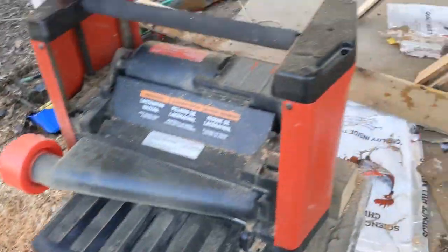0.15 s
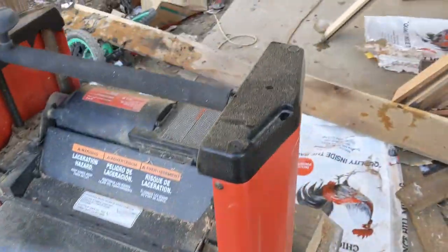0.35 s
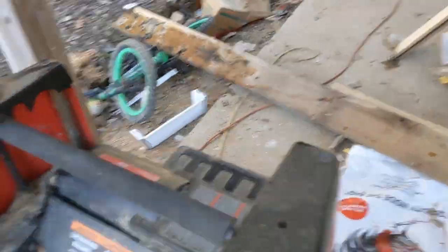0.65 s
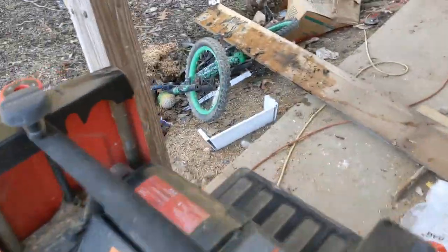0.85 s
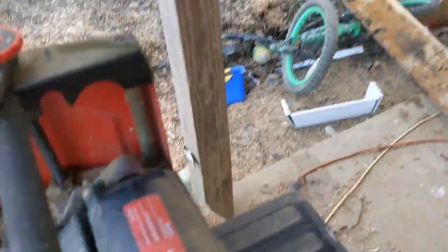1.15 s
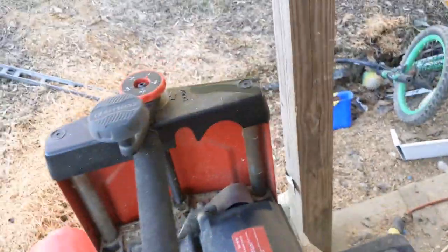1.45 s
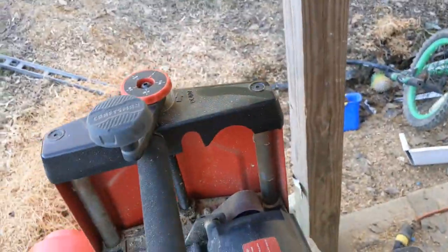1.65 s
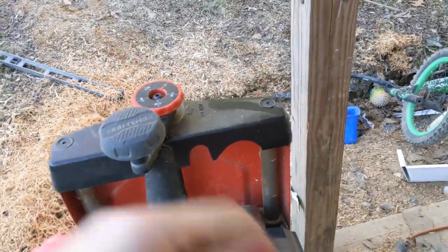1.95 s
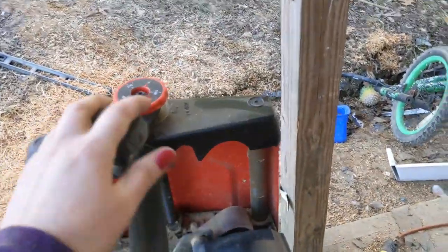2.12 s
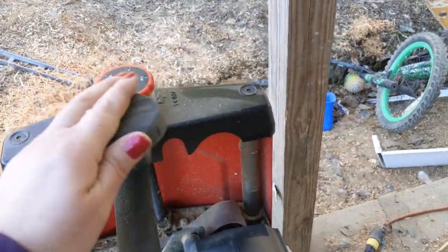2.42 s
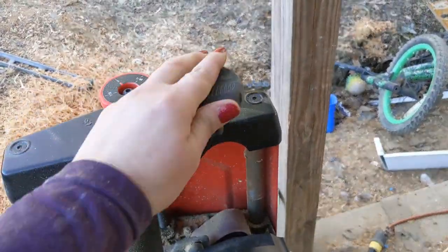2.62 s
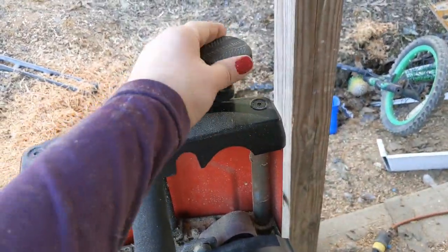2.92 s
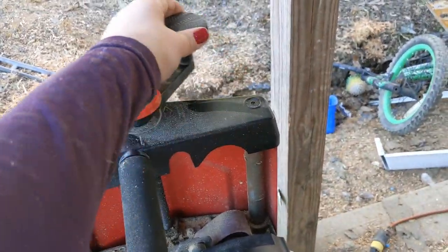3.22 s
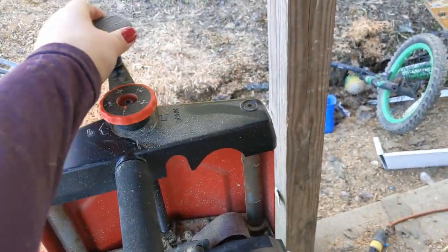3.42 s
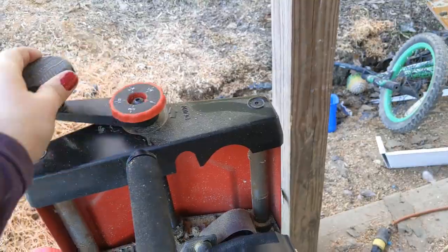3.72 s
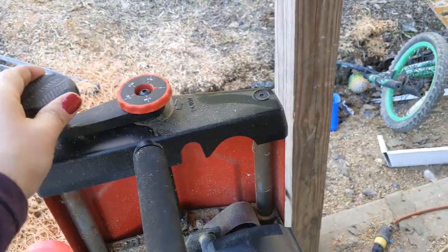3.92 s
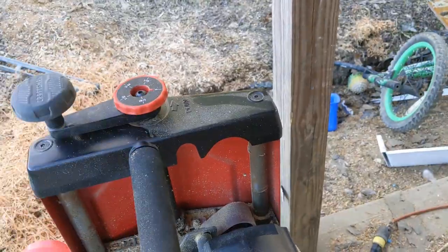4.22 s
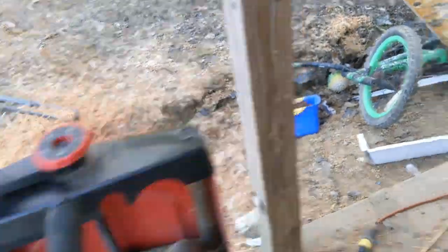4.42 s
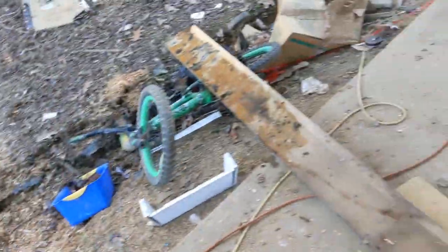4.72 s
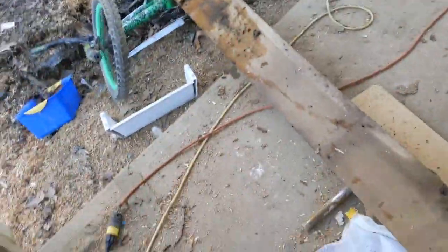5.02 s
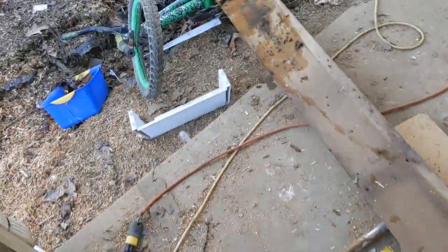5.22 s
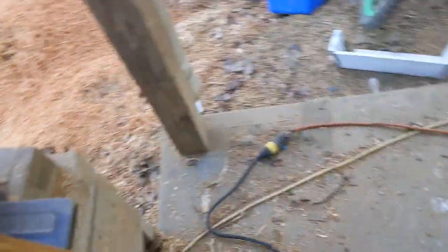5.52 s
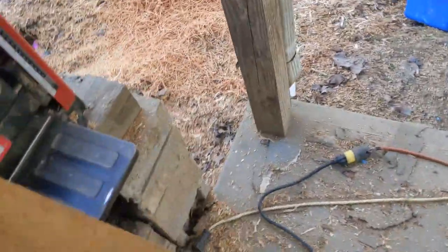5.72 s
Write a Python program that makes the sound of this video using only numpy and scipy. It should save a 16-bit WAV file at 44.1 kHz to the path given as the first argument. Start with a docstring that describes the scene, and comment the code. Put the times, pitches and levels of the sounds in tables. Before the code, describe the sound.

Outdoors, a small electric planer runs continuously, heard close on a handheld stereo phone. A deep hum and high motor whine sit inside rushing air. An exhaust whoosh swells and cuts off early; the middle stays steady beside the crank, then the sound shifts and the hum thins as the listener moves to the far side.

```python
"""A benchtop planer runs outdoors. At first the listener is on its infeed side, where the exhaust stream whooshes by.
From about 1 s the listener is at the height crank; a hand on the crank damps the frame's buzz around 3 s.
After about 4.2 s the listener moves on to the outfeed, and each side has its own balance of tones and air.
All along, the cutterhead hums on multiples of its speed and the motor whines a little over twice as fast;
air, made from shaped noise, rushes through the housing and throbs with each lap of the belt."""
import sys
import numpy as np
from scipy import signal
from scipy.fft import rfft, irfft
from scipy.io import wavfile
from scipy.ndimage import uniform_filter1d

SR = 44100
rng = np.random.default_rng(int(sys.argv[2]) if len(sys.argv) > 2 else 0)


def store_pcm(level_fs):
    """Save levels as 16-bit WAV."""
    pcm = np.round(np.clip(level_fs, -1, 1) * 32767).astype(np.int16)
    wavfile.write(sys.argv[1], SR, np.atleast_2d(pcm).T)


N = 258426
TIME = np.arange(N) / SR  # s
FREQ = np.fft.rfftfreq(N, 1 / SR) + 1e-3  # Hz, kept above zero for divisions and logarithms


def undb(db):
    """Turn decibels into gain."""
    return 10 ** (np.asarray(db) / 20)


def panned(difference):
    """Split a left-minus-right difference evenly into a left and a right offset, in the same unit."""
    return np.array([[.5], [-.5]]) * difference


def curves(table):
    """Join each column of a table by straight lines in time."""
    s, *columns = np.transpose(table)
    return [np.interp(TIME, s, column) for column in columns]


def swell(s, length):
    """A bell-shaped rise and fall around time s, 1 at its middle."""
    return np.exp(-(2 * (TIME - s) / length) ** 2)


def walk(rate):
    """Smooth random wavering of spread 1 that changes about rate times a second."""
    size = 8192
    hz = np.fft.rfftfreq(size, TIME[-1] / size)
    slow = irfft(rfft(rng.standard_normal(size)) / np.sqrt(1 + (hz / rate) ** 6))
    return np.interp(TIME, np.linspace(0, TIME[-1], size), slow / slow.std())


# the listener's way round the machine: (time [s], place [-1 infeed, 0 crank, 1 outfeed])
PATH = [(0, -1.06), (0.8, -0.86), (0.97, -0.53), (1.15, 0.009), (4.2, -0.01), (4.58, 0.3), (4.74, 0.82),
        (5.05, 1), (5.86, 0.97)]


def at_place(levels):
    """A value that glides between its infeed, crank and outfeed settings as the listener moves."""
    return np.interp(curves(PATH)[0], (-1, 0, 1), levels)


BELT_HZ = 43.05  # laps of the belt per second


def belt(depth):
    """A gain that throbs once a lap of the belt."""
    return 1 + depth * np.sin(2 * np.pi * BELT_HZ * TIME)


def resonance(hz, width_hz):
    """Gain of a resonance, 1 at its centre and falling away on both sides."""
    return 1 / (1 + (1.83 * (FREQ - hz) / width_hz) ** 2)


# likeness of the air's noise at the left and right microphone ports: (frequency [Hz], correlation [0-1])
LIKENESS = [(30, 0.27), (200, 0.94), (800, 0.69), (1400, 0.37), (2800, 0.46), (4400, 0), (7000, 0.16)]


def port_noise():
    """Spectra of unit noise per Hz at the two ports: most alike in the bass, hardly alike in the top treble."""
    hz, alike = np.transpose(LIKENESS)
    alike = np.clip(np.interp(FREQ, hz, alike), 0, 1)
    mid, side = rfft(rng.standard_normal((2, N))) * np.sqrt(SR) / 2
    shared = mid * np.sqrt(1 + alike)
    opposite = side * np.sqrt(1 - alike)
    return shared + np.array([[1], [-1]]) * opposite


def sliding_band(noise, shape, shift_hz):
    """Noise with a resonant shape whose centre slides by shift_hz over time."""
    # keeping only positive frequencies lets a turning phase move the whole band
    band = 2 * np.fft.ifft(noise * shape, N)
    return (band * np.exp(2j * np.pi * np.cumsum(shift_hz) / SR)).real


def tone(turns, multiple, db, flutter_db, apart=0):
    """One multiple of a shaft's rotation; apart sets how far its phase drifts between the ports (radians)."""
    k = round(multiple)
    # the housing delays each multiple more than the last, which smears the chops into an even hum
    smear = 3 * np.pi / 8 * k ** 2
    phase = 2 * np.pi * k * turns - smear + panned(apart * walk(1))
    return np.sqrt(2) * undb(db + flutter_db * walk(33)) * np.sin(phase)


# level of the draught, before its overall gain: (infeed [dB], crank [dB], outfeed [dB])
DRAUGHT_DB = (-67, -55.5, -72)
# puffs of draught on the microphone: (time [s], length [s], rise [dB])
PUFFS = [(0.896, 0.11, 7), (2.274, 0.11, 7), (5.448, 0.089, 20), (5.83, .25, 9)]


def draught(level_db=-22.0, top_hz=170, gust_db=2.0):
    """The machine's draught brushes the microphone as a low rumble, most of all by the crank, with a few puffs."""
    puff_db = sum(rise * swell(s, length) for s, length, rise in PUFFS)
    rumble = irfft(port_noise() / (1 + (FREQ / top_hz) ** 4), N)
    return rumble * undb(level_db + at_place(DRAUGHT_DB) + puff_db + gust_db * walk(13))


# basic colour of the rushing air: (frequency [Hz], left [dB per Hz], right [dB per Hz])
RUSH = [(30, -81, -81.5), (102, -71, -76.5), (190, -74, -74.5), (356, -63, -65), (643, -66, -99),
        (1045, -67, -65.5), (1440, -73.5, -75.5), (1800, -71, -68.5), (2950, -68.5, -65),
        (4120, -72.5, -73), (6020, -72.5, -73.5), (6820, -75, -77.5), (9340, -72.5, -73.5),
        (12140, -82.5, -76), (15500, -86.5, -84.5)]
# added colour on each side of the machine: (frequency [Hz], infeed [dB], crank [dB], outfeed [dB])
RUSH_SIDES = [(140, 3, 3, 0.5), (257, -1, 0.4, 1.5), (604, 1, 2, 0.5), (905, 0, 0.5, -1), (1450, 4, 4, 3.5),
              (1950, 1, 1.5, 1.5), (2850, 0.5, 1, -0.5), (4360, -0.1, 1, 2.2), (6500, -0.5, -0.3, 2),
              (11000, 0.5, 0, 1.7), (13500, 1, 0.5, -1)]
# the hiss as the ports turn, of which only the departure from each column's median counts, less at low pitch:
# (time [s], treble level [dB], left minus right of the top treble [dB])
HISS = [(0.0, -38, -3), (0.54, -35.5, 6), (0.64, -33, -4), (0.72, -35.5, -1), (1.24, -32.5, 2),
        (1.3, -35, 7), (1.37, -34.5, -1), (1.73, -34.5, 1), (2.59, -33.5, -3.5), (4.69, -34.5, -0.5),
        (4.82, -38.5, 6), (5.09, -38, -2), (5.5, -42.5, -9), (5.81, -36.5, 1), (5.86, -39, -4)]


def air(throb=0.16, throb_hz=1500, flicker_db=0.5, own_flicker_db=1.07, beam_hz=3500):
    """Turbulent air rushes out; its hiss pulses once a lap of the belt, and its treble depends on the ports' aim."""
    hz, *sides = np.transpose(RUSH)
    colour = np.array([undb(np.interp(np.log(FREQ), np.log(hz), db)) for db in sides])
    # the small housing radiates little bass
    spectrum = port_noise() * colour / np.sqrt(1 + (190 / FREQ) ** 8)
    treble_db, shade_db = (column - np.median(column) for column in curves(HISS))
    zones = np.transpose(RUSH_SIDES)[0]
    gusts, out = walk(41), 0
    # each zone of pitch fades into its neighbours and has its own level
    for (centre, *levels), own in zip(RUSH_SIDES, np.eye(len(zones))):
        band = irfft(spectrum * np.interp(np.log(FREQ), np.log(zones), own), N)
        pulse = belt(throb * centre / (centre + throb_hz))  # deeper in the treble
        aim_db = treble_db / (1 + (beam_hz / centre) ** 2)
        aim_db = aim_db + panned(shade_db * (centre / zones[-1]) ** 2)
        flicker = flicker_db * gusts + own_flicker_db * walk(9.3)
        out = out + band * pulse * undb(at_place(levels) + aim_db + flicker)
    return out


# resonances of the housing and chip outlet: (centre [Hz], width [Hz], left [dB per Hz], right [dB per Hz],
# change at the infeed [dB], change at the outfeed [dB])
HOUSING = [(241, 94, -74, -74, -4, -8.5), (438.6, 73, -65.5, -62, -3, 2), (742.5, 35, -58.5, -72, -11, 1.5),
           (837, 52, -60, -65, -1, -0.5), (1092, 200, -74, -72, -10, -8), (2080, 100, -65, -59.5, -1, -8),
           (2301, 116, -92, -55.5, -11, -6), (2650, 100, -66.5, -62, -9, -11), (2933, 93, -75, -68.5, 4, 0),
           (4384, 320, -73, -66.5, -20, -3.5)]


def housing(drift=0.007, sway_db=1.56, throb=0.2):
    """The air rings the housing; each resonance drifts, swells on its own and carries differently to each side."""
    noise = port_noise() / np.sqrt(1 + (190 / FREQ) ** 8)  # little bass
    out = 0
    for hz, width, left, right, infeed, outfeed in HOUSING:
        ringing = sliding_band(noise, resonance(hz, width), drift * hz * walk(1.5))
        db = np.array([[left], [right]]) + at_place((infeed, 0, outfeed)) + sway_db * walk(4.7)
        out = out + ringing * undb(db)
    return belt(throb) * out


# roar of the chip outlet, whose pitch depends on the angle it is heard from:
# (time [s], centre [Hz], level [dB per Hz], left minus right [dB])
ROAR = [(0, 2159, -64.5, -15), (.15, 2051, -61, -8), (.3, 2462, -68, -9), (.5, 2438, -60, -8),
        (.72, 2450, -60.5, -12), (.8, 2284, -56.5, -9.5), (.98, 2374, -58.5, -6), (1.1, 2473, -63, -6),
        (1.3, 2662, -82, 5), (1.7, 2702, -71, -2), (2.1, 2259, -63, -7), (3.9, 2249, -65.5, -5.5),
        (4.3, 2261, -65, -9), (4.7, 2377, -61, -8), (4.9, 2495, -66, 1), (5.25, 2458, -78, -3),
        (5.5, 2850, -77, -9), (5.62, 2950, -65, -6), (5.86, 2893, -61.5, -9)]


def outlet(width_hz=330, skirt_hz=1100, skirt_db=-11):
    """A band of roar from the chip outlet slides in pitch and swells as the listener passes."""
    hz, db, pan_db = curves(ROAR)
    middle = hz.mean()
    shape = resonance(middle, width_hz) + undb(skirt_db) * resonance(middle, skirt_hz)
    return sliding_band(port_noise(), shape / shape.max(), hz - middle) * undb(db + panned(pan_db))


# the exhaust stream, which builds as the listener enters it and is cut off by the housing:
# (time [s], centre [Hz], level [dB per Hz], left minus right [dB])
WHOOSH = [(.05, 2950, -89, -2), (.2, 2950, -62, -11), (.33, 2930, -58, -5), (.5, 2886, -58, -1),
          (.6, 2740, -55.5, -1), (.735, 2634, -53.5, -1), (.775, 2566, -68, -2), (.9, 2600, -110, 0)]


def whoosh(width_hz=530):
    """The exhaust stream swells, slides down and stops short; its eddies make it coarse."""
    hz, db, pan_db = curves(WHOOSH)
    eddy_db = 1.2
    stream = sliding_band(port_noise(), resonance(hz[0], width_hz), hz - hz[0])
    return stream * undb(db + panned(pan_db) + eddy_db * walk(45))


# narrow beams of hiss from the vents that the listener crosses: (time [s], length [s], centre [Hz], width [Hz],
# glide [Hz per s], left [dB per Hz], right [dB per Hz])
JETS = [(0.027, .1, 8700, 900, 0, -70, -71), (.64, 0.16, 12000, 4000, -0.5, -85, -71),
        (.8, 0.79, 5980, 350, 0, -69, -67), (1.05, 0.18, 6620, 120, 0, -66, -65.5),
        (1.418, 0.19, 6620, 120, 0.5, -68, -57.5), (.96, 0.37, 10110, 420, 1, -72, -64),
        (1.217, 0.054, 10250, 500, 0, -71, -63), (1.85, 0.4, 4240, 220, 0.5, -68.5, -66),
        (2.19, .08, 10500, 900, 0, -75, -69), (3.42, 0.25, 10250, 400, 3, -73, -71),
        (3.62, 0.55, 9050, 419.6, 1.5, -71, -73), (4.673, .12, 9700, 1400, -5000, -76, -72),
        (4.487, 0.19, 6080, 400, -900, -72, -66), (4.56, 0.14, 3450, 250, 1, -60, -64),
        (4.68, 0.27, 2620, 100, -300, -55, -59), (4.923, 0.41, 5460, 480, 1699, -72, -64.5),
        (4.967, 0.33, 2504, 90.05, -200, -54.5, -60), (5.267, 0.38, 2010, 200, -500, -77, -57),
        (5.392, 0.31, 2310, 100, 0, -71, -54.5)]


def jets():
    """Beams of hiss from the vents swell, slide and fade as the listener crosses them."""
    noise = port_noise()
    out = 0
    for s, length, hz, width, glide, left, right in JETS:
        hiss = sliding_band(noise, resonance(hz, width), glide * (TIME - s))
        out = out + hiss * undb([[left], [right]]) * swell(s, length)
    return out


# pitch at which the left port leads by a whole cycle: (infeed [Hz], crank [Hz], outfeed [Hz])
WHOLE_CYCLE_HZ = (3450, 4095, 3254)


def round_the_phone(sound, patch_hz=380, patch_s=0.18, above_hz=1800):
    """Air noise bends round the phone, so the left port leads; bright and dull treble patches come and go at random."""
    hz, s, frames = signal.stft(sound, SR, nperseg=1024)
    patch_db = 1.5
    patches = rng.standard_normal(frames.shape)
    # two rounds of averaging along pitch and time turn the random grid into soft bright and dull patches
    for axis, size in 2 * ((1, patch_hz / hz[1]), (2, patch_s / s[1])):
        patches = uniform_filter1d(patches, max(round(size), 1), axis=axis, mode="wrap")
    treble_share = (hz / (hz + above_hz))[:, None]
    colour = undb(patch_db * patches / patches.std() * treble_share)
    cycle_hz = np.interp(s, TIME, at_place(WHOLE_CYCLE_HZ))
    lead = 2 * np.pi * (hz[:, None] / cycle_hz) ** 2  # radians
    turned = frames * colour * np.exp(.5j * np.array([lead, -lead]))
    return signal.istft(turned, SR)[1][:, :N]


# levels of the motor's unbalance: (infeed [dB], crank [dB], outfeed [dB])
SHAFT_DB = (-39, -40, -35)
# levels of the frame's buzz: (infeed [dB], crank [dB], outfeed [dB])
BUZZ_DB = (-42.5, -41.5, -50)
BEAT_HZ, BUZZ_BEAT_HZ = 24.1, 40.3  # how far unbalance and buzz lie above the hum
GRIP_S, GRIP_LENGTH_S, GRIP_DB = 3.16, 1.07, -18  # the hand on the crank damps the frame's buzz


def drone(hum):
    """The motor's unbalance and a buzz of the frame lie just above the knives' hum and beat against it."""
    waver_hz = .12
    buzz_db = at_place(BUZZ_DB) + GRIP_DB * swell(GRIP_S, GRIP_LENGTH_S)
    out = 0
    for above_hz, db in ((BEAT_HZ, at_place(SHAFT_DB)), (BUZZ_BEAT_HZ, buzz_db)):
        cycles = hum + np.cumsum(above_hz + waver_hz * walk(1.4)) / SR
        out = out + tone(cycles, 1, db, flutter_db=1.8, apart=0.17)
    return out


# tones of armature, fan and commutator: (multiple of the motor speed, left [dB], right [dB],
# change at the infeed [dB], change at the outfeed [dB])
WHINE = [(2, -60, -56, -4, -1), (7, -48, -49.5, -8, -3), (10, -56, -52, 0, -4), (12, -54, -51, -2, -10),
         (13, -57.5, -53, -9, 2), (14, -59, -56, -3, 0), (18, -67, -52.5, 0, 2), (30, -65, -65, -8, -6),
         (31, -65, -65, -11, -6), (32, -53.5, -63, 0, 1), (35, -66, -67, -6, -6), (36, -64, -64, -6, -8)]
# the fan blades' tone: (time [s], left [dB], right [dB], lag of the left port behind the right [radians])
FAN = [(0, -52, -48, 2.5), (.1, -49, -37, 1.8), (.22, -54, -34.5, 0.56), (.45, -67, -34, .4),
       (.57, -52, -42, 2), (.69, -38, -35, 0.99), (.82, -38.5, -48.5, 2.6), (1, -40, -39, 0.81),
       (1.28, -50, -37, 1.2), (1.4, -47, -52, 2.72), (1.95, -39.5, -54, 2.2), (2.15, -39, -40, 1.6),
       (2.4, -37, -34.5, 1.47), (2.75, -45, -36, 1.2), (2.98, -36.5, -39, 3), (3.15, -35, -36, 2.26),
       (3.5, -34.5, -38, 2.54), (3.8, -44, -32, 2.37), (4.15, -40, -38.5, 2.1), (4.38, -43, -47, 3.7),
       (4.48, -40, -43, 1.15), (4.6, -36, -42, 1.07), (4.68, -50, -47, 1.3), (5.4, -63, -46, 1),
       (5.86, -54, -43, .8)]
FAN_BLADES = 9


def motor(shaft, rattle_hz=0.54, fan_drift=0.15):
    """Armature and fan whine; play blurs the armature's high tones, the steadier fan reaches the left port late."""
    armature = shaft + np.cumsum(rattle_hz * walk(91)) / SR
    swell_db, fan_flutter_db = 1.6, 1.5
    whine = 0
    for k, left, right, infeed, outfeed in WHINE:
        db = np.array([[left], [right]]) + at_place((infeed, 0, outfeed)) + swell_db * walk(4.4)
        whine = whine + tone(armature, k, db, flutter_db=4, apart=k / 7)
    *blades_db, lag = curves(FAN)
    at_ports = shaft - panned(lag / (2 * np.pi * FAN_BLADES))
    return whine + tone(at_ports, FAN_BLADES, np.array(blades_db), fan_flutter_db, apart=fan_drift)


def roaming():
    """Turns by which the low tones' phase wanders while the listener is away from the crank."""
    most_turns = .05
    return most_turns * np.abs(curves(PATH)[0]) * walk(3.9)


# cutterhead tones: (multiple of its speed, infeed [dB], crank [dB], outfeed [dB], left minus right [dB])
KNIVES = [(1, -57.5, -52, -75, 2.5), (2, -32.5, -28, -41, 2), (3, -42, -35.5, -40.5, -1),
          (4, -41.5, -29.5, -45.5, 1), (5, -43, -42.5, -43, -3.5), (6, -37.5, -35.5, -42.5, 1.5),
          (7, -49, -51, -53.5, 16), (8, -49, -74, -53, 1), (9, -61, -59, -64, 2),
          (10, -61, -46.5, -67, 1.5), (11, -46, -45.5, -52, -8)]
# loud and dead spots where a tone meets its own reflection: (time [s], length [s], multiple, change [dB])
SPOTS = [(.22, 0.38, 4, -2), (0.224, 0.35, 7, -5), (.15, .45, 5, -16), (.25, 0.55, 11, -16),
         (0.303, 0.26, 6, 2), (0.525, 0.11, 6, -17), (0.54, 0.15, 4, 4), (0.8, 0.46, 6, -14),
         (0.898, 0.13, 11, 8), (.85, 0.36, 7, 5.5), (1.2, 0.31, 4, 0.5), (1.3, 1.9, 3, -7),
         (1.5, 0.37, 11, -13), (1.9, 0.96, 4, -2.5), (4.203, 0.85, 11, 3), (4.568, 0.34, 4, 5),
         (4.58, 0.64, 3, -4.5), (4.72, .3, 5, -8), (5, 0.34, 11, -16), (5.45, 0.4, 11, 9.5),
         (5.1, .4, 4, -15)]
# the ports straddle a node of one knife tone and hear it in nearly opposite phase
NODE_MULTIPLE, NODE_S, NODE_LENGTH_S, NODE_RADIANS = 4, 0.25, .4, 2.3


def cutterhead(turns, wander, hum, flutter_db=0.66, weak_flutter_db=1.6, sway_db=0.5, weak_sway_db=1.3,
               apart=0.069, weak_apart=0.86, throb=0.025):
    """Knives chop the air twice a turn, making the deep hum; their mismatch adds odd multiples. Weak tones waver more."""
    out = 0
    for k, *levels, pan_db in KNIVES:
        weak = np.interp(-max(levels), (36, 44), (0, 1))  # 0 for strong tones, 1 for weak ones
        spot_db = sum(change * swell(s, length) for s, length, multiple, change in SPOTS
                      if round(multiple) == round(k))
        own_sway_db = sway_db + weak * (weak_sway_db - sway_db)
        own_flutter_db = flutter_db + weak * (weak_flutter_db - flutter_db)
        own_apart = apart + weak * (weak_apart - apart)
        db = at_place(levels) + spot_db + own_sway_db * walk(1.5) + panned(pan_db)
        angle = hum / 2 if round(k) == 2 else turns + wander / k
        if round(k) == NODE_MULTIPLE:
            angle = angle + panned(NODE_RADIANS * swell(NODE_S, NODE_LENGTH_S) / (2 * np.pi * k))
        out = out + tone(angle, k, db, own_flutter_db, own_apart)
    return out * belt(throb)


# speed of the cutterhead, which wavers a little and rises toward the end: (time [s], speed [turns per s])
SPEED = [(0, 169.7), (.4, 171.7), (.7, 170.4), (1.05, 171.2), (2, 171.6), (3.2, 171.3), (4.1, 172.15),
         (4.7, 171), (5.86, 176)]
# pitch shift of the deep hum, which lies lowest at the outfeed: (time [s], shift [Hz])
HUM_SHIFT = [(0, 0), (.3, 2.5), (.65, -2.5), (1.05, 1), (4.55, 1.5), (5.05, -8), (5.4, -9), (5.86, -8)]
BELT_RATIO = 2.136  # motor turns per cutterhead turn


def scene(hunt_hz=0.119, slip_hz=0.24):
    """Both shafts follow one speed, the motor wavering on the belt; the rush of air lies around their tones."""
    turns = np.cumsum(curves(SPEED)[0] + hunt_hz * walk(4.0)) / SR
    shaft = BELT_RATIO * turns + np.cumsum(slip_hz * walk(19.8)) / SR
    wander = roaming()
    hum = 2 * turns + wander + np.cumsum(curves(HUM_SHIFT)[0]) / SR  # cycles
    rushing = round_the_phone(air() + housing() + outlet() + whoosh() + jets())
    tones = drone(hum) + motor(shaft) + cutterhead(turns, wander, hum)
    return draught() + rushing + tones


TOP_HZ = 15700


def record(dry):
    """The recorder cuts everything above its top frequency steeply."""
    low_pass = signal.ellip(10, .1, 80, TOP_HZ, fs=SR, output="sos")  # 0.1 dB ripple, 80 dB cut
    return signal.sosfilt(low_pass, dry)


dry = scene()
out = record(dry)
store_pcm(out)
```